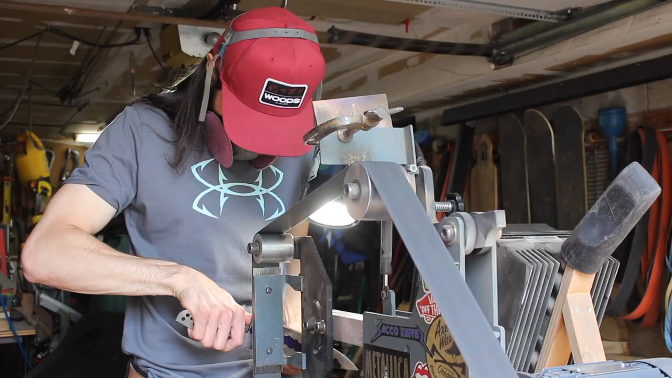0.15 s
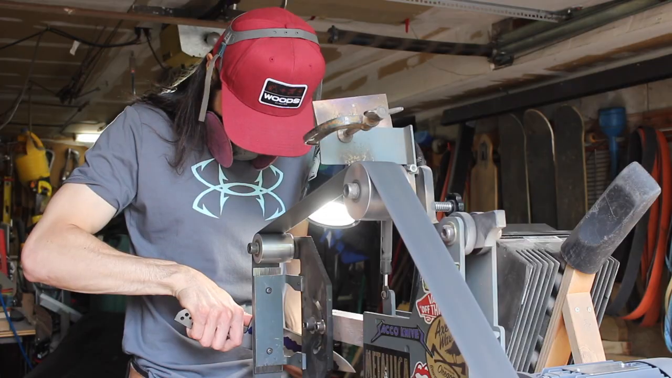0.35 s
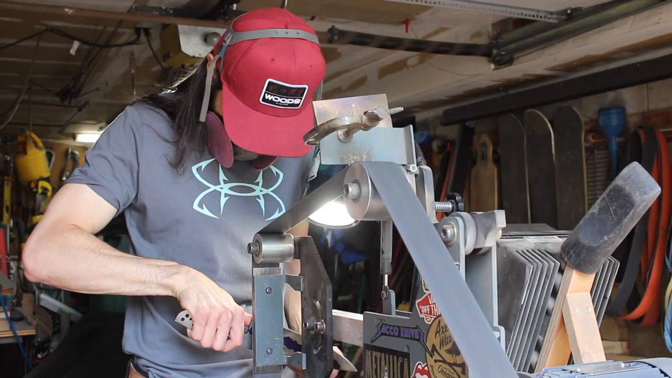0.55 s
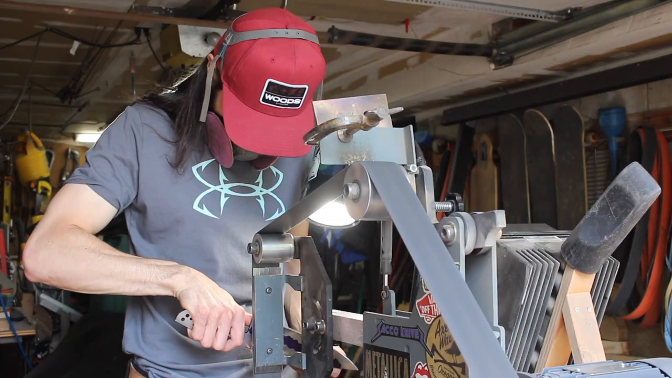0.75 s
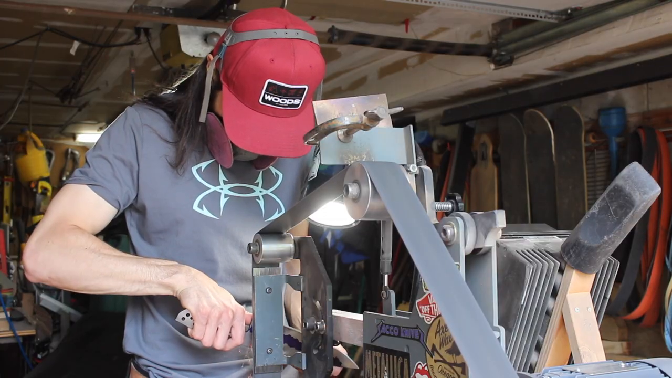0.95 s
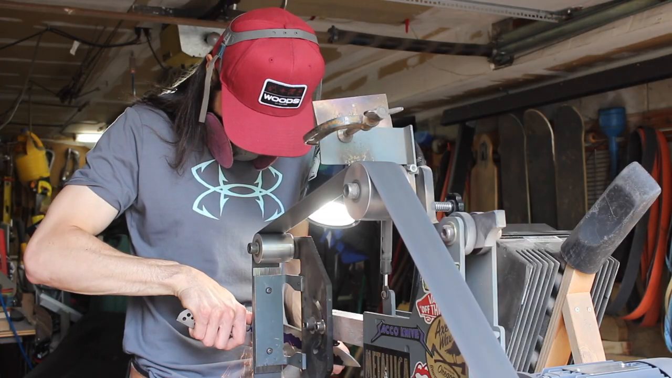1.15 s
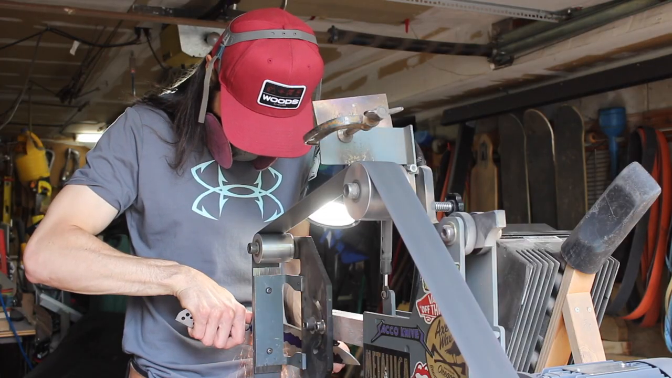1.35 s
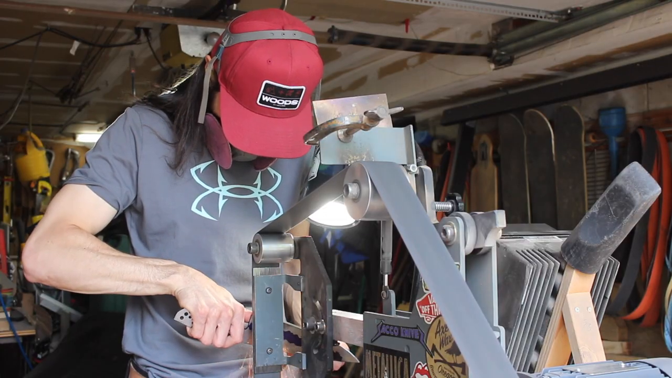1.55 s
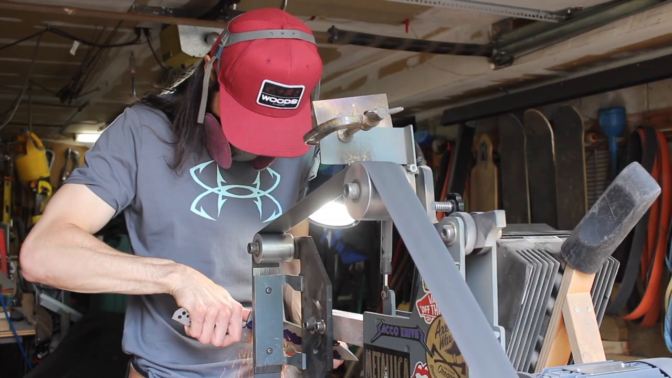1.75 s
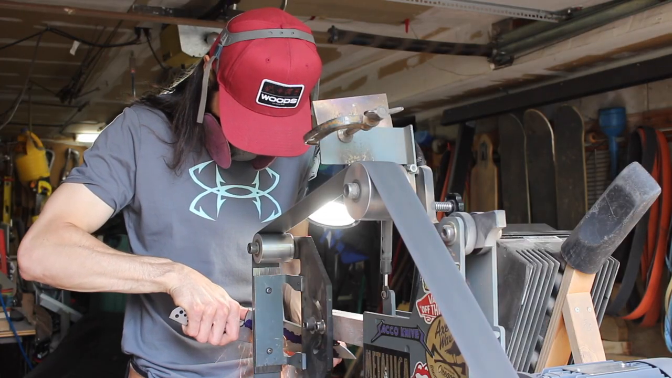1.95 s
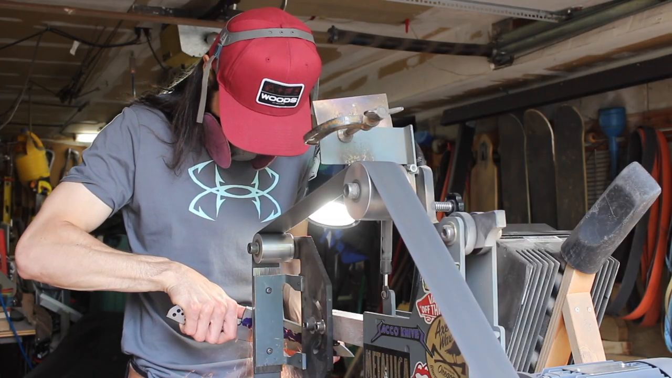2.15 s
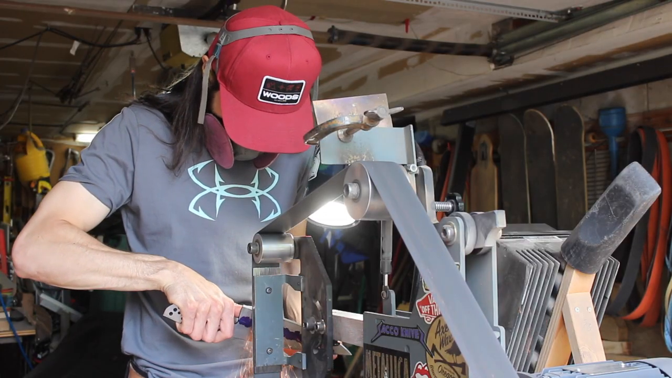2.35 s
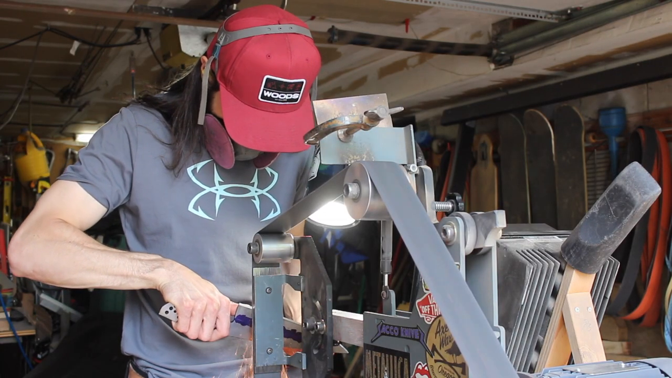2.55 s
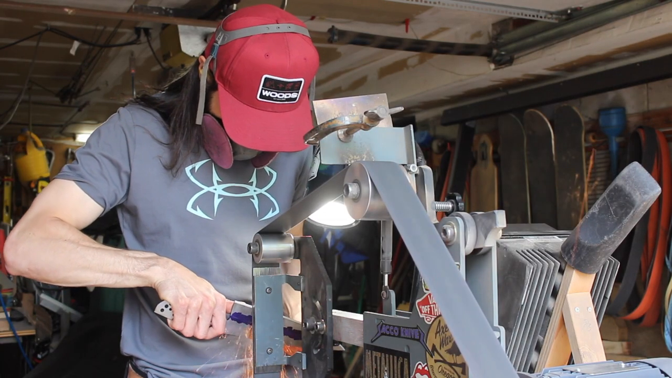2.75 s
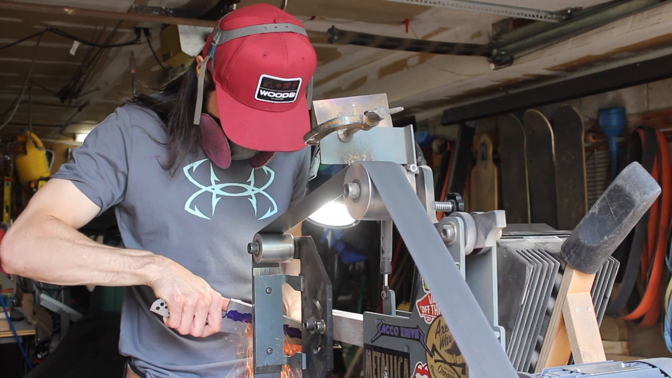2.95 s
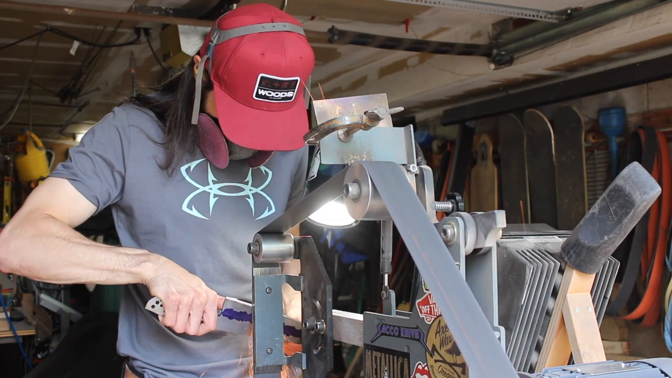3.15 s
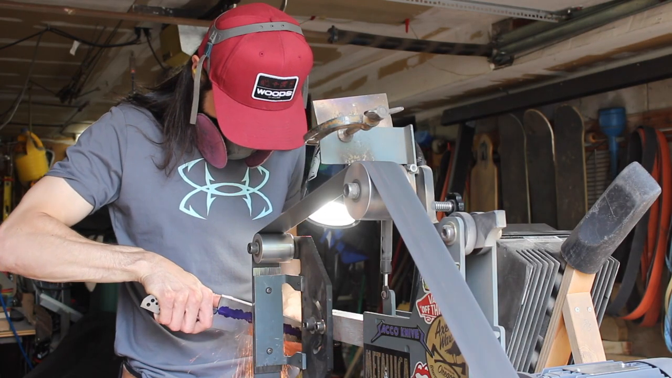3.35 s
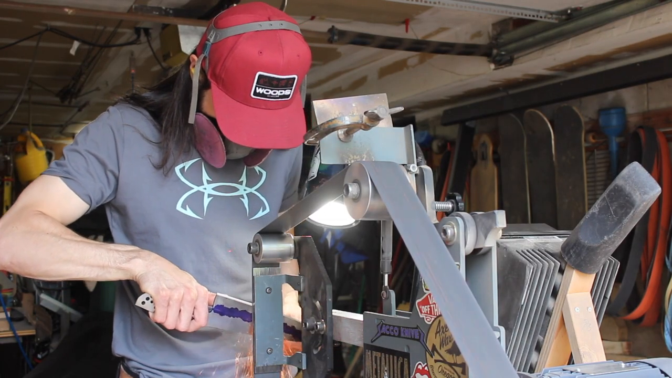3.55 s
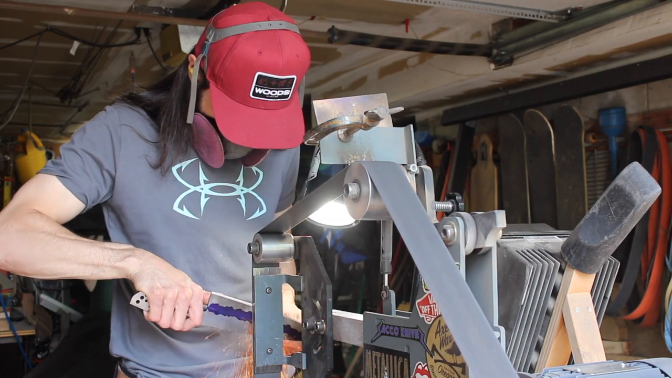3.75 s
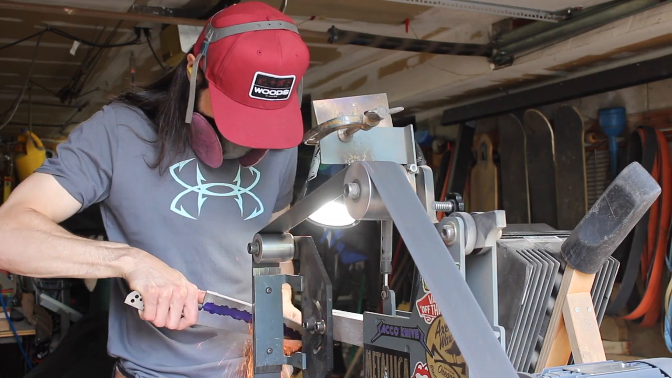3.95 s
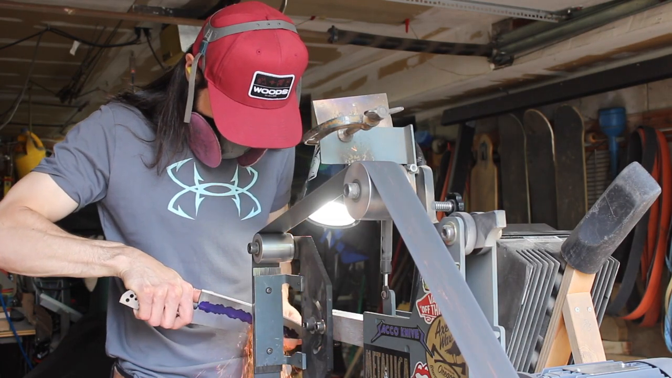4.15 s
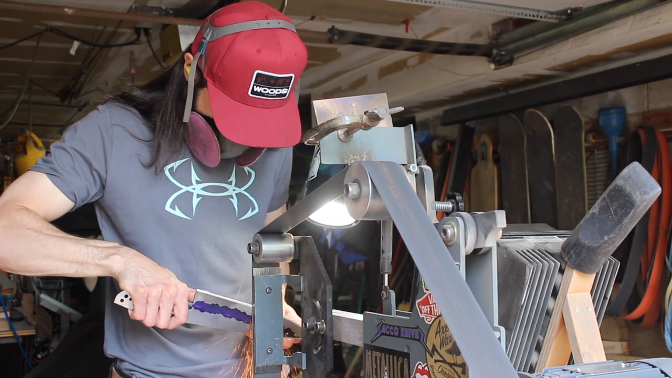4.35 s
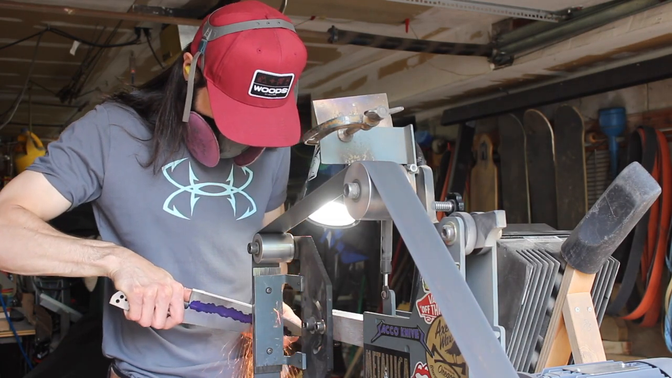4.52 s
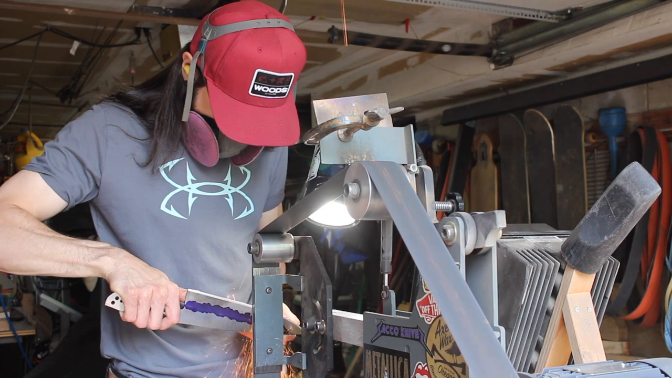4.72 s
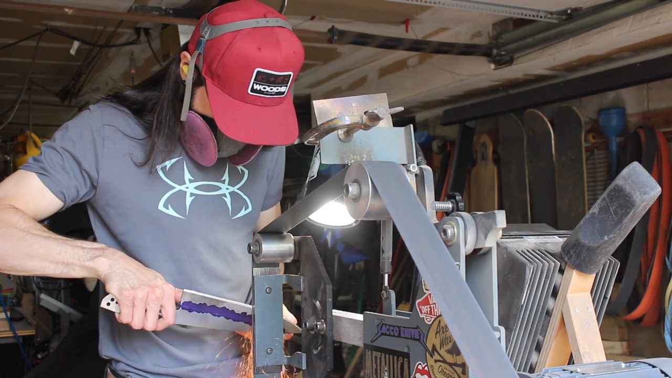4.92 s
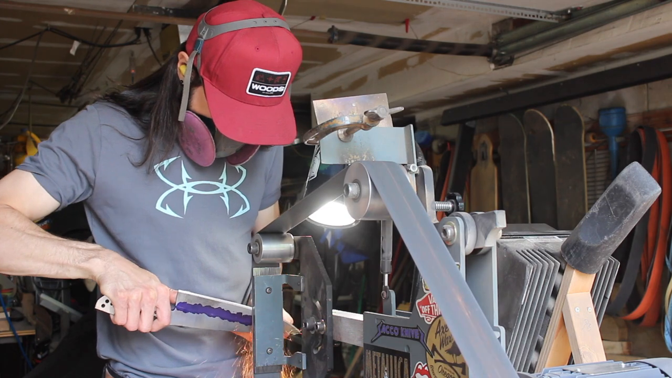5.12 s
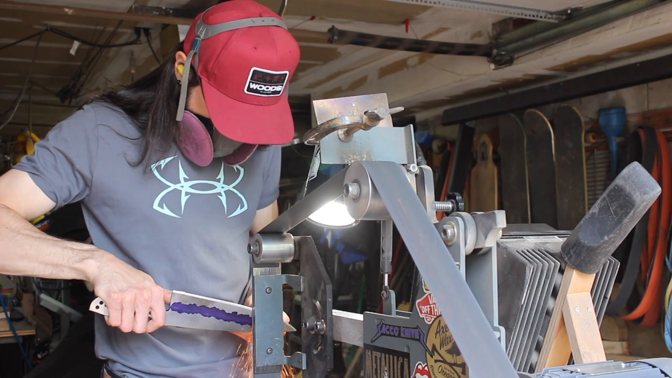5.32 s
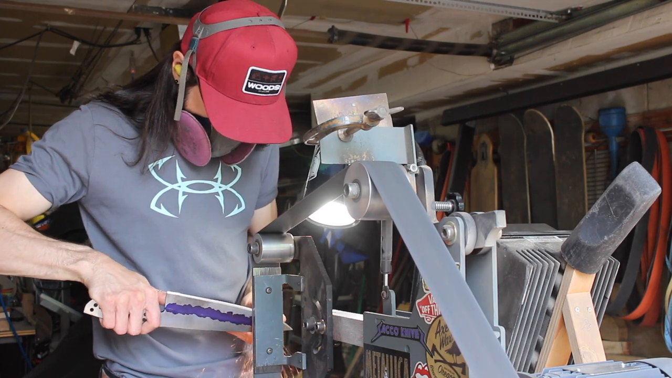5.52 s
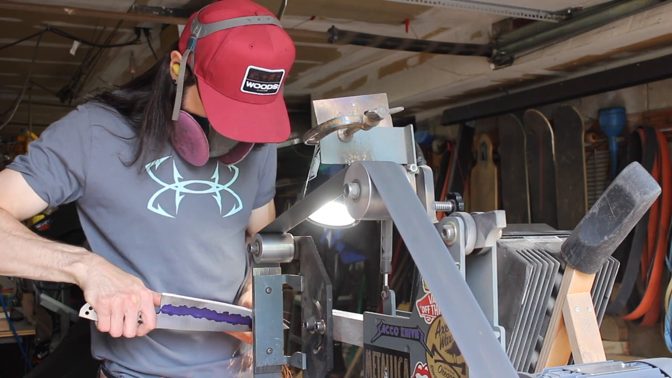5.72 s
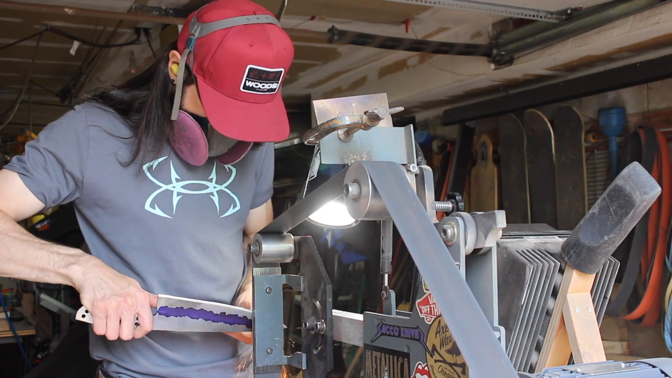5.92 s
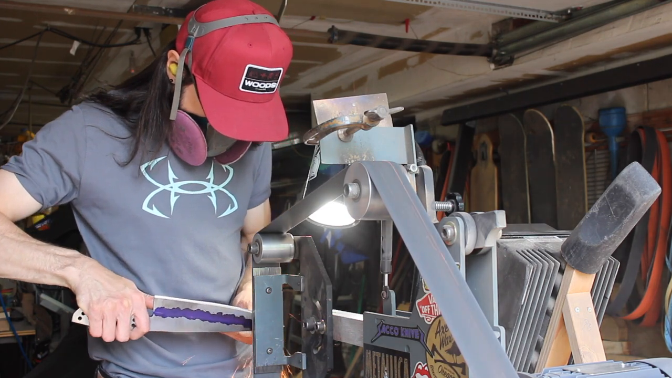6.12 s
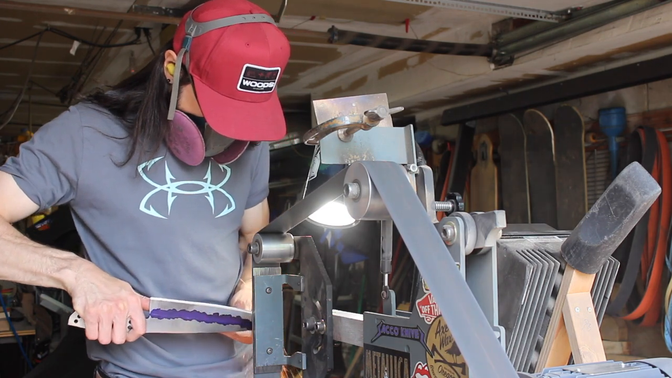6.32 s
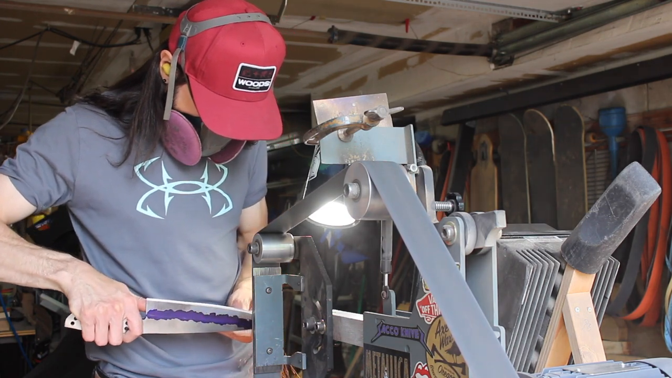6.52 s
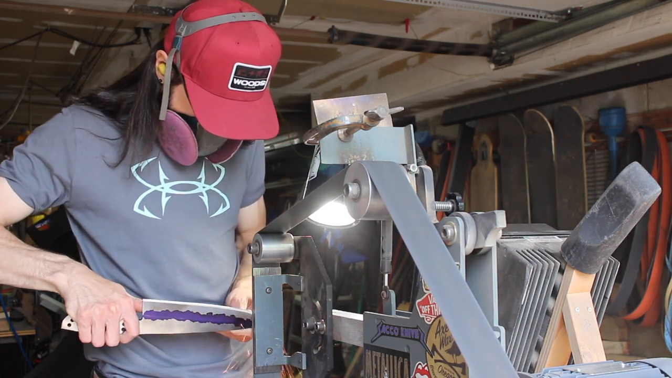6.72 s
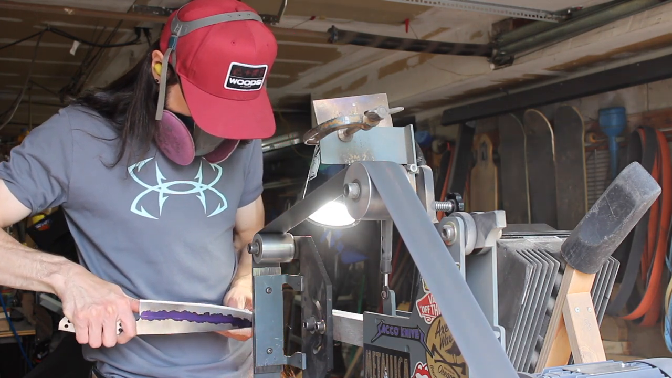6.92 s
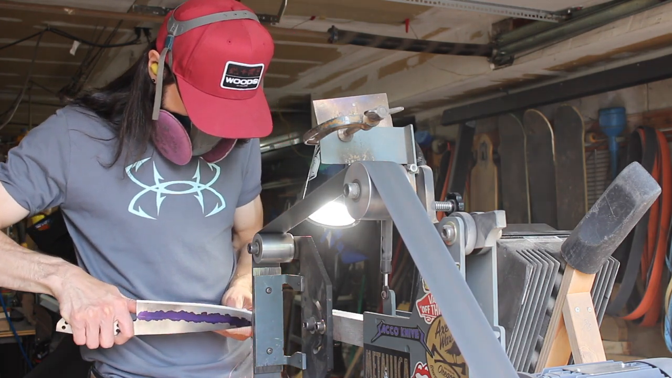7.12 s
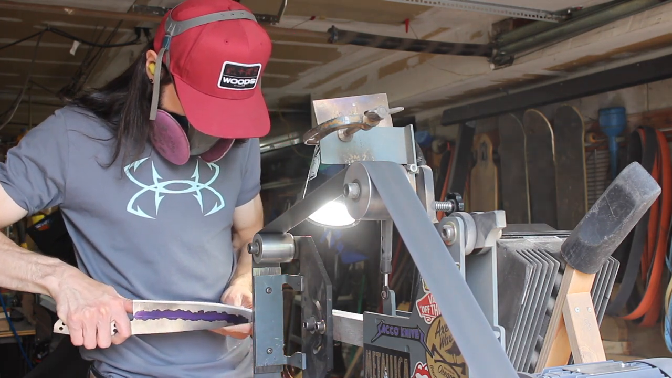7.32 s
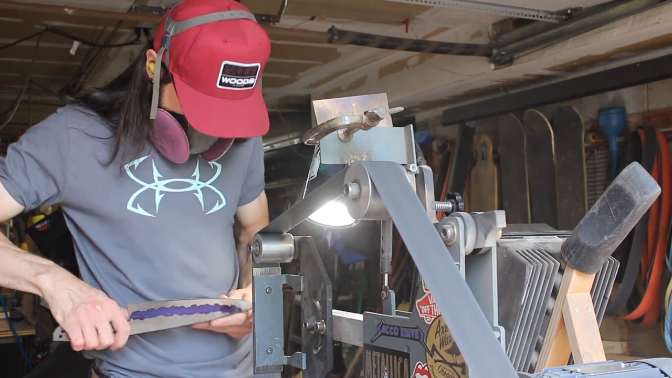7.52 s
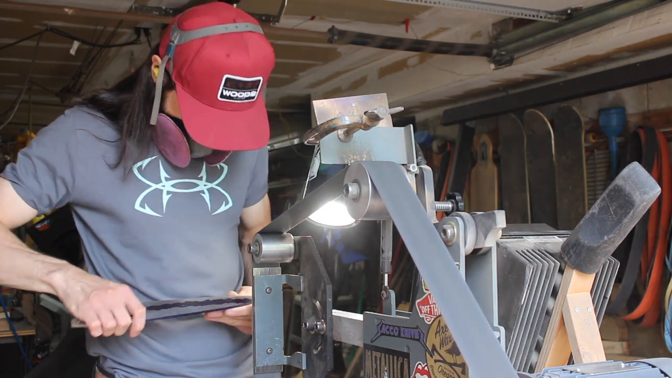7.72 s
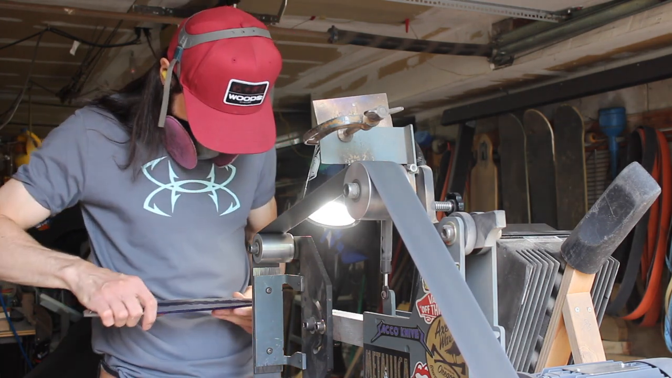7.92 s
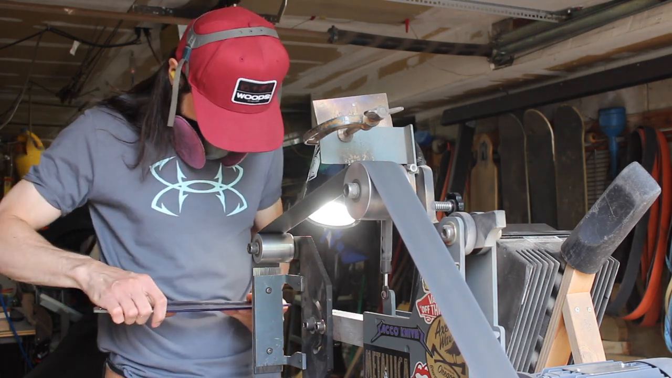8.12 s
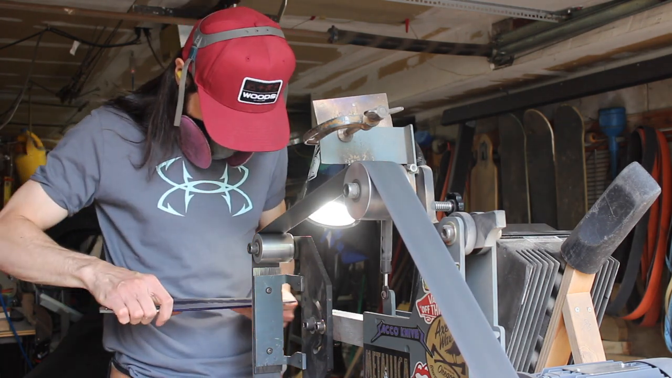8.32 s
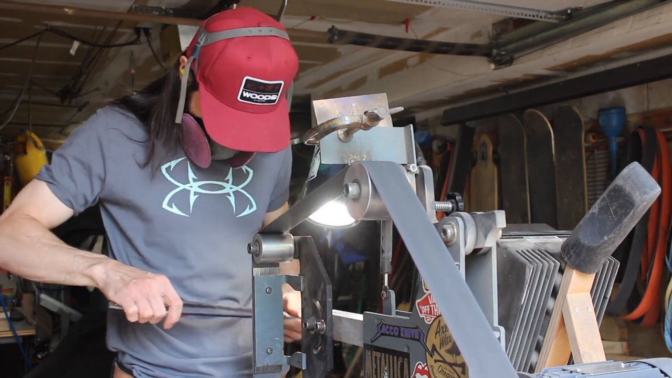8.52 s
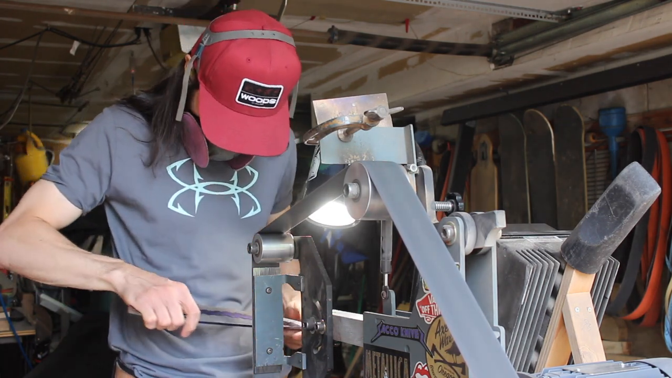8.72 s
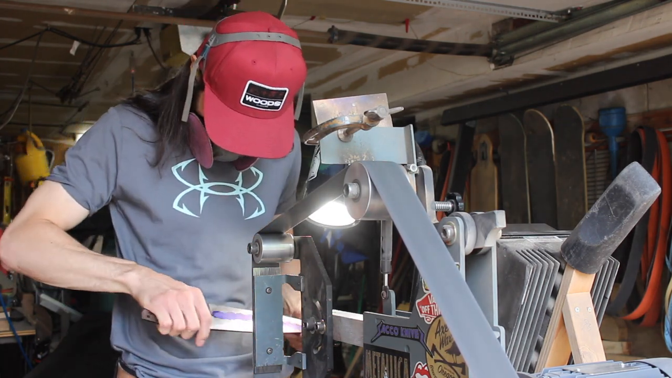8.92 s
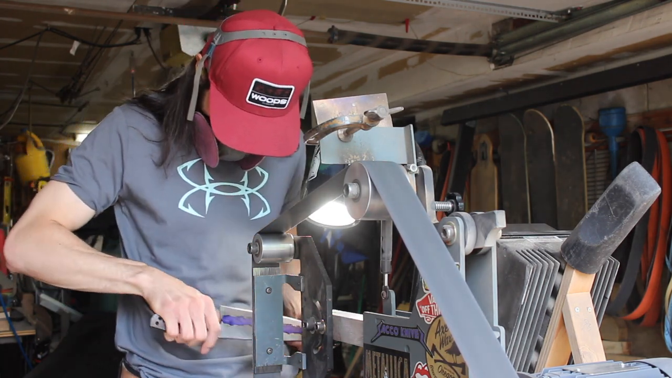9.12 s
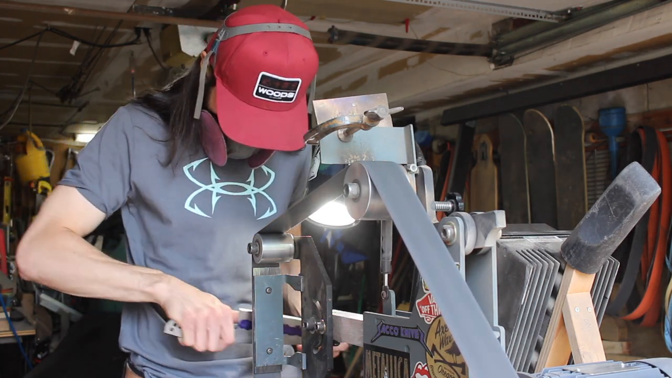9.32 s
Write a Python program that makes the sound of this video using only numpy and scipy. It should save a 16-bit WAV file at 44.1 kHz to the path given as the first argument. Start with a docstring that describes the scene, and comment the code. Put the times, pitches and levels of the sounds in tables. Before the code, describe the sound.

Close, dry workshop sound, essentially mono: a sanding belt whirs and hisses, its splice ticking rapidly each lap. Light blade contact rattles harshly, then a longer chatter turns into sizzling, shrill steel grinding for about six seconds, its resonances wandering upward and changing as the knife is drawn heel to tip. It cuts off sharply; the free belt keeps fluttering, with soft low rumbles underneath.

```python
"""Workshop: on a running belt grinder a steel knife blade chatters, is drawn from heel to tip and lifts off.
Grit is looped noise read by belt position, so the hiss repeats about nine times a second, once a lap.
Cutting grit drives resonators for the blade's modes, which swell as the contact slides; chatter and slap
are gated grit through resonances; hiss, frame, hum, drone and rumble lie below.
A gain control holds loud passages down, then recovers.
"""
import sys
import numpy as np
from scipy import signal
from scipy.fft import rfft, irfft, next_fast_len
from scipy.io import wavfile
from scipy.ndimage import uniform_filter1d, minimum_filter1d, map_coordinates

SR = 44100
rng = np.random.default_rng(int(sys.argv[2]) if len(sys.argv) > 2 else 0)


def transcribe(u):
    """Save the signal u as a 16-bit wav file named by the first command-line argument.

    u: samples, shape (n,) or (channels, n), limited to [-1, 1]; the rate is SR.
    q: integer samples, one column per channel.
    """
    v = np.clip(np.atleast_2d(u).T, -1, 1)
    q = np.round(v * 32767).astype(np.int16)
    wavfile.write(sys.argv[1], SR, q)


N = 417627


def from_db(db):
    """Decibels to gain."""
    return 10 ** (np.asarray(db) / 20)


def rms_one(x):
    """Scale to unit rms."""
    return x / np.sqrt(np.mean(x ** 2) + 1e-20)


def seconds():
    """Time of every sample."""
    return np.arange(N) / SR


def in_time(rows):
    """Columns of a breakpoint curve at every sample."""
    s, *columns = np.transpose(rows)
    return [np.interp(seconds(), s, column) for column in columns]


def bell(distance):
    """Gaussian of height 1; distance in standard deviations."""
    return np.exp(-.5 * distance ** 2)


def drift(knots_per_s):
    """Slow smooth random curve, unit rms."""
    knots = rng.standard_normal(4096)
    coarse_s = seconds()[::32]
    curve = map_coordinates(knots, [coarse_s * knots_per_s], mode="wrap")
    return rms_one(np.interp(seconds(), coarse_s, curve))


def resonate(x, f_hz, width_hz):
    """Two-pole resonance, unit rms."""
    r = np.exp(-np.pi * width_hz / SR)
    poles = [1, -2 * r * np.cos(2 * np.pi * f_hz / SR), r * r]
    return rms_one(signal.lfilter([1, 0, -1], poles, x))


def colour(x, spectrum):
    """Shape noise to a spectrum, interpolated over log frequency; unit rms."""
    size = next_fast_len(N)
    f_hz, level_db = np.transpose(spectrum)
    bins_hz = np.maximum(np.arange(size // 2 + 1) * SR / size, 1)
    gain = from_db(np.interp(np.log(bins_hz), np.log(f_hz), level_db))
    return rms_one(irfft(rfft(x, size) * gain, size)[:N])


def looped(laps, count):
    """Random pattern of count features around the belt, read as it passes."""
    pattern = signal.resample(rng.standard_normal(count), count * 8)
    return rms_one(np.interp(laps % 1 * len(pattern), np.arange(len(pattern)), pattern))


def grit(laps, fresh, lumpy_db):
    """Grains strike in lap order, in lumps; sideways tracking swaps grains, and some strikes are new."""
    track_rad = 0.81 * drift(1.284)
    grains = np.cos(track_rad) * looped(laps, count=5000) + np.sin(track_rad) * looped(laps, count=5000)
    strikes = grains + fresh * rng.standard_normal(N)
    return rms_one(strikes * from_db(lumpy_db * looped(laps, count=80)))


TOUCH_S, BITE_S, PRESS_S, LIFT_S, LIFT_DB_PER_S = 0.73, .14, 1.0, 7.4, 400  # BITE, PRESS: rise times


def contact(attack_s):
    """Blade force on the belt, 0-1: builds from the touch, holds, dies at the lift."""
    t = seconds()
    build = np.clip((t - TOUCH_S) / attack_s, 0, 1)
    return build * from_db(-LIFT_DB_PER_S * np.clip(t - LIFT_S, 0, 1))


NODE_SWING_DB, NODE_OFFSET = 2, 0.51  # swing either way; pattern offset at the tip, node spacings


def mode_gain(place, nodes, best_place, reach, rise_db):
    """A mode swells near its best place and dips as the contact crosses its nodes."""
    squared_distance = (place - best_place) ** 2 / (reach ** 2 + 1e-12)
    nearness = np.exp(-.5 * np.minimum(squared_distance, 100))
    node_pattern = np.cos(2 * np.pi * (nodes * (1 - place) + NODE_OFFSET))
    return from_db(rise_db * nearness + NODE_SWING_DB * node_pattern)


# grit cutting steel, spectrum shape: f/Hz, relative level/dB
CUTTING_SPECTRUM = [(400, -27.5), (1000, -20), (1400, -21), (2300, -18), (4500, 2), (6500, -1),
                    (9000, -3.5), (12000, -7), (15500, -9.5)]
# cutting hiss along the stroke: t/s, relative level/dB
CUTTING_LEVEL = [(.85, 0.5), (1.25, 6.5), (1.6, 5), (2.5, -3), (3.4, -14), (4.5, 5.5), (5.4, -5), (6, 4),
                 (7.4, 1.5)]
# hand-held blade modes: f/Hz, width/Hz, relative level/dB, nodes/blade length,
# best place/0-1 (heel-tip), reach/blade length, rise there/dB
BLADE_MODES = [(530.5, 28, -42.5, 1.63, 0.24, 0.09, 10.5), (569, 48, -45.5, 1.7, 0.5, 0.25, 16),
               (881, 47, -41.5, 2.17, 0.17, 0.05, 4), (1158, 31, -51.5, 2.7, 0.59, 0.15, 16.0),
               (1186, 150, -43, 2.0, 0.2, 0, -1), (1582, 25, -42.5, 2.2, 0.76, 0.05, 9.5),
               (1790, 29, -39.0, 3.2, 0.95, 0.14, 9.0), (2110, 18, -41.5, 3.2, 0.64, 0.23, 14.5),
               (2217, 38, -35, 3.5, 0.68, 0.33, 10.5), (2200, 157, -27.5, 2.95, 0.92, 0.06, 5.5),
               (2574, 65, -33.0, 4.44, 1, 0.2, 11.5), (2997, 200, -28, 3.92, 0.49, 0.06, 9.5),
               (3185, 48.0, -36.5, 3.44, 1, 0.1, 16), (3330, 270, -35.5, 4.54, 0.35, 0.29, 12.5),
               (3543, 45, -30.5, 5.0, 0.97, 0.05, 8.5), (4428, 61.0, -27, 6.07, 0.35, 0.08, 7),
               (4607, 190, -29, 5.2, 0.78, 0.09, 11), (4960, 63, -29.5, 5.64, 0.76, 0.02, 8),
               (5900.0, 73, -38, 6.4, 0.77, 0.25, 13), (6590, 240, -29, 4.47, 0.08, 0.08, 5),
               (7333, 76.0, -35, 3.7, 1, 0.04, 16.5), (8540, 24, -39, 5.7, 0.94, 0.05, 9.0),
               (8820, 380.0, -41.0, 5.33, 0.04, 0.1, 20.5), (9280, 77, -43.5, 5.7, 0.74, 0.09, 14),
               (10220, 35, -40, 4.35, 0.4, 0.09, 10), (10470, 32, -48, 6.3, 0.98, 0.28, 20.0),
               (11530, 73, -39.0, 5.8, 0.0, 0.06, 7), (12250, 77, -38.5, 7.4, 0.54, 0.13, 10.0),
               (13840, 103.0, -41.5, 6.9, 0.93, 0.06, 12.0), (14440, 85.0, -44, 8.4, 0.35, 0.2, 10.0),
               (15230.0, 96.0, -46.5, 6.0, 0.5, 0.21, 15)]
HEEL_S = 1.3  # heel (place 0) passes here, tip (place 1) at the lift
SCRATCH_DB, RING_DB = -23.5, 0.94  # offsets added to the tables' levels


def grinding(laps):
    """Grit cuts the steel and rings the blade; modes take turns as the contact slides from heel to tip."""
    place = (seconds() - HEEL_S) / (LIFT_S - HEEL_S)
    scratch_db, = in_time(CUTTING_LEVEL)
    cutting = grit(laps, fresh=0.41, lumpy_db=1.86)
    # each mode gets the cutting noise with its own random lag, under 5 ms, so modes do not flicker in step
    lags = rng.integers(0, SR // 200, len(BLADE_MODES))
    ring = 0
    for (f_hz, width_hz, level_db, *shape), lag in zip(BLADE_MODES, lags):
        mode = resonate(np.roll(cutting, lag), f_hz, width_hz)
        ring = ring + from_db(RING_DB + level_db) * mode_gain(place, *shape) * mode
    hiss = colour(grit(laps, fresh=0.72, lumpy_db=2.5), CUTTING_SPECTRUM)
    scratch = from_db(SCRATCH_DB + scratch_db) * hiss
    unsteady_hand = from_db(0.27 * drift(26))
    return unsteady_hand * (contact(BITE_S) * scratch + contact(PRESS_S) * ring)


# chatter bursts of the lightly held blade: start t/s, length/s, level/dB
CHATTER_BURSTS = [(-.01, 0.13, -23), (0.142, 0.095, -22), (0.24, 0.099, -18.5), (0.63, 0.048, -23.5),
                  (0.658, 0.77, -19.5)]
BURST_ATTACK, BURST_RELEASE = 0.13, 0.28  # shares of burst length


def chatter(laps):
    """In bursts until it settles, the blade bounces five times a lap, exciting two resonances in series."""
    strength = 0
    for start_s, length_s, level_db in CHATTER_BURSTS:
        gone = (seconds() - start_s) / length_s
        envelope = np.clip(np.minimum(gone / BURST_ATTACK, (1 - gone) / BURST_RELEASE), 0, 1)
        strength = strength + from_db(level_db) * envelope
    bounce = np.cos(2 * np.pi * 5 * laps)
    strikes = grit(laps, fresh=0.67, lumpy_db=3.0) * from_db(1.5 * bounce)
    return strength * resonate(resonate(strikes, f_hz=3040, width_hz=350), f_hz=3400, width_hz=330)


# parts of the belt's buzz on the platen: phase/lap, half length/lap, f/Hz, width/Hz, relative level/dB
PLATEN_SLAP = [(.42, .1, 3200, 600, -3.5), (.51, .035, 3680, 550, -3.5), (.61, .1, 3450, 800, -4)]
SLAP_DB = -33


def slap(laps):
    """Once a lap the splice and the wavy stretch around it buzz against the platen."""
    ripple = np.cos(2 * np.pi * 25 * laps)
    strikes = grit(laps, fresh=0.98, lumpy_db=-0.5) * from_db(6.4 * ripple)
    out = 0
    for phase, half_length, f_hz, width_hz, level_db in PLATEN_SLAP:
        offset_laps = (laps - phase + .5) % 1 - .5
        passing = bell(offset_laps / half_length)
        buzz = resonate(resonate(strikes * passing, f_hz, width_hz), f_hz, width_hz)
        out = out + from_db(SLAP_DB + level_db) * buzz
    return out


# free-running belt on its wheels, spectrum shape: f/Hz, relative level/dB
RUNNING_SPECTRUM = [(90, -51), (125, -40), (180, -18), (250, -22.5), (380, -18.5), (560, -4.5), (750, -7.5),
                    (1250, -15), (1850, -9.5), (3240, -3.5), (5060, -4), (6080, -11), (8200, -7.5),
                    (15500, -15.5)]
# frame, platen and wheel resonances: f/Hz, width/Hz, level/dB
FRAME_MODES = [(351.2, 8.4, -50), (428.2, 11, -47), (532, 17, -42.5), (604.5, 20, -41.5), (749, 25, -38.5),
               (1643, 30, -43.5), (2674, 21, -41), (3200, 32, -34), (3323, 50, -34), (3705, 19, -34),
               (4163, 43, -36), (4450, 260, -31.5), (4594, 20, -42), (5050, 280, -28), (5500, 120, -35.5),
               (6630, 250, -33.5)]
RUNNING_DB, HUM_DB, DRONE_DB = -20.5, -56.5, -55.5


def machine(laps):
    """The belt hisses over its wheels and shakes the frame; the motor hums below, less so under load."""
    rolling = from_db(RUNNING_DB) * colour(grit(laps, fresh=0.84, lumpy_db=0.86), RUNNING_SPECTRUM)
    shaking = grit(laps, fresh=0.67, lumpy_db=0.5)
    frame = sum(from_db(level_db) * resonate(shaking, f_hz, width_hz)
                for f_hz, width_hz, level_db in FRAME_MODES)
    hum = rms_one(np.sin(2 * np.pi * 102.3 * seconds() + .4 * drift(5)))
    drone_spectrum = [(15, -26), (48, 4), (75, -6), (125, -24), (180, -15), (300, -36), (900, -93)]
    drone = colour(rng.standard_normal(N), drone_spectrum)
    load_gain = from_db(-5.0 * contact(PRESS_S))
    return rolling + frame + load_gain * (from_db(HUM_DB) * hum + from_db(DRONE_DB) * drone)


# rumble swells: centre t/s, half length/s, level/dB
RUMBLE_SWELLS = [(4.5, 0.19, -48), (5.4, .06, -49), (6.42, 0.13, -40), (8.5, 0.35, -56),
                 (8.79, 0.044, -40.5), (9.298, 0.18, -48)]


def rumble():
    """Soft swells of deep coloured noise."""
    strength = 0
    for centre_s, half_length_s, level_db in RUMBLE_SWELLS:
        distance = np.clip((seconds() - centre_s) / half_length_s, -10, 10)
        strength = strength + from_db(level_db) * bell(distance)
    spectrum = [(10, -5), (32, 4), (70, -11), (150, -24), (600, -80)]
    return strength * colour(rng.standard_normal(N), spectrum)


# belt speed, a little higher while the drive works against the blade: t/s, speed/(laps/s)
BELT_SPEED = [(0, 8.75), (1.1, 8.74), (1.6, 8.835), (3, 8.93), (5.3, 8.94), (6, 8.92), (7.35, 8.915),
              (7.75, 8.77), (8.2, 8.735), (9.47, 8.73)]


def scene():
    """Grit, chatter and slap follow the belt's travel, which flutters very slightly; both channels alike."""
    laps_per_s, = in_time(BELT_SPEED)
    laps = np.cumsum(laps_per_s) / SR + 0.00012 * drift(25)
    sound = grinding(laps) + chatter(laps) + slap(laps) + machine(laps) + rumble()
    return np.stack([sound, sound])


def gain_control(x, limit_db, hold_s, release_db_per_s):
    """Gain drops at once when the level passes the limit, waits, then climbs back."""
    level_db = 10 * np.log10(np.maximum(uniform_filter1d(x[0] ** 2, size=800), 1e-12))
    hold = max(int(hold_s * SR), 1)
    over_db = np.maximum(level_db - limit_db, 0)
    held_db = -minimum_filter1d(-over_db, hold, origin=(hold - 1) // 2)
    ramp_db = release_db_per_s * seconds()
    cut_db = np.maximum.accumulate(held_db + ramp_db) - ramp_db
    return x * from_db(-uniform_filter1d(cut_db, size=200))


CUTOFF_HZ = 15850


def record(dry):
    """Gain control, then a steep elliptic low-pass."""
    held = gain_control(dry, limit_db=-18.7, hold_s=.2, release_db_per_s=18.0)
    return signal.sosfilt(signal.ellip(12, .1, 80, CUTOFF_HZ, fs=SR, output="sos"), held)


dry = scene()
out = record(dry)
transcribe(out)
```